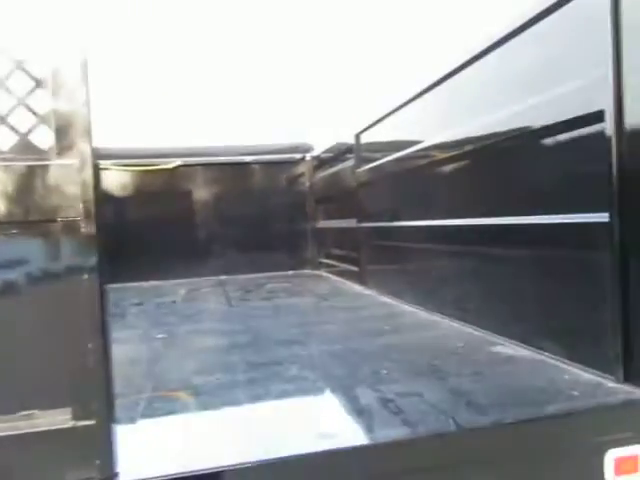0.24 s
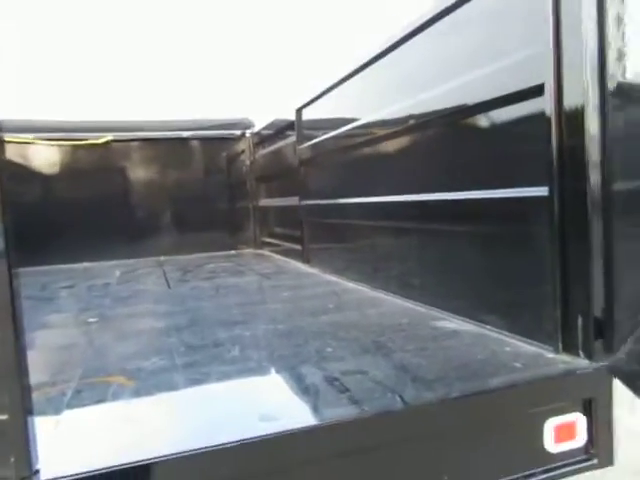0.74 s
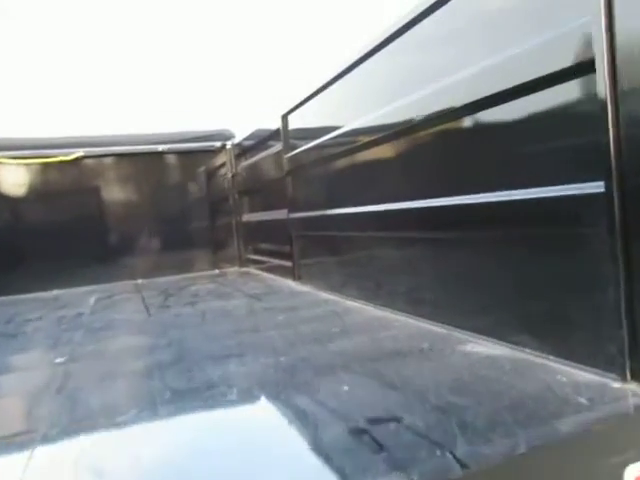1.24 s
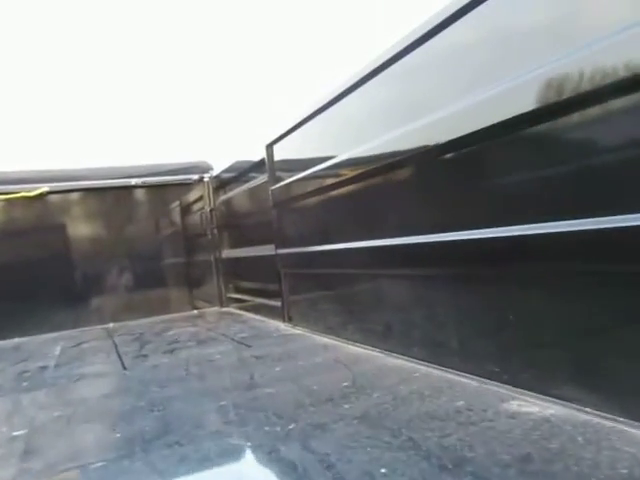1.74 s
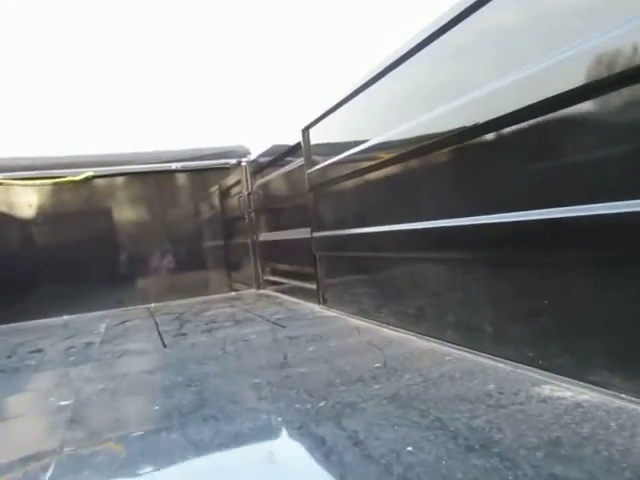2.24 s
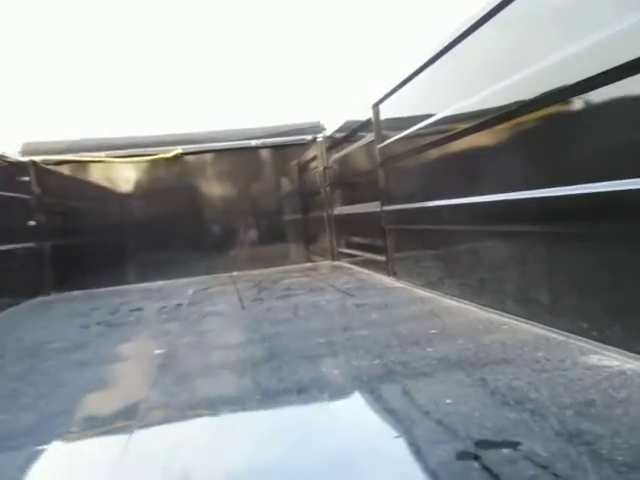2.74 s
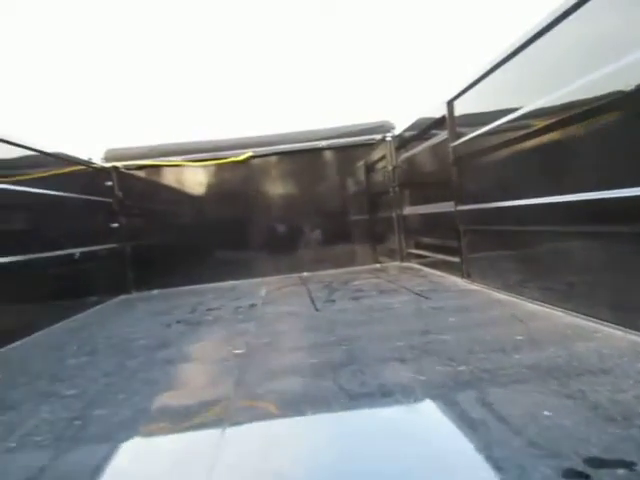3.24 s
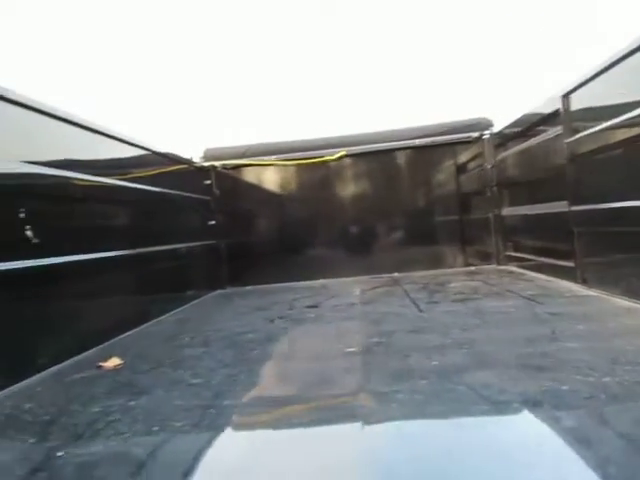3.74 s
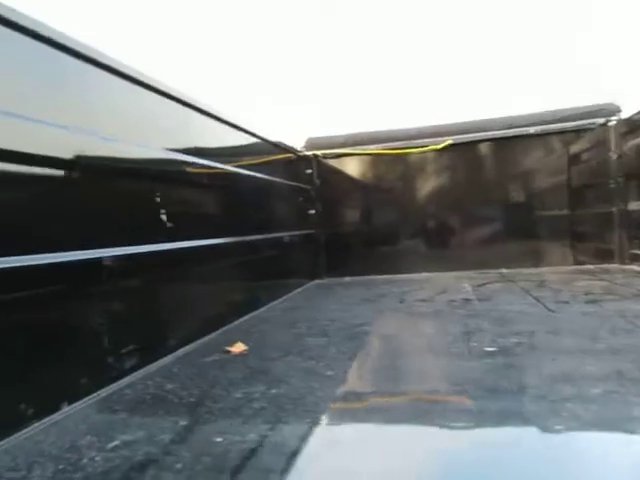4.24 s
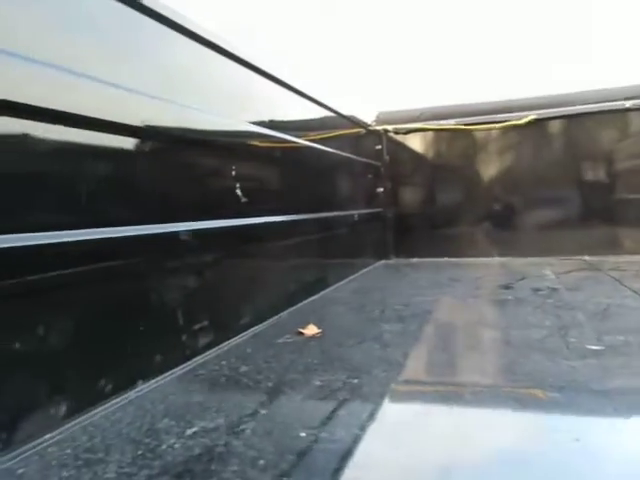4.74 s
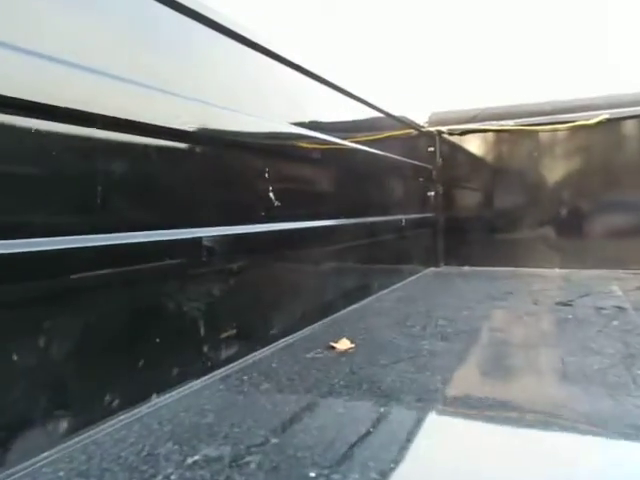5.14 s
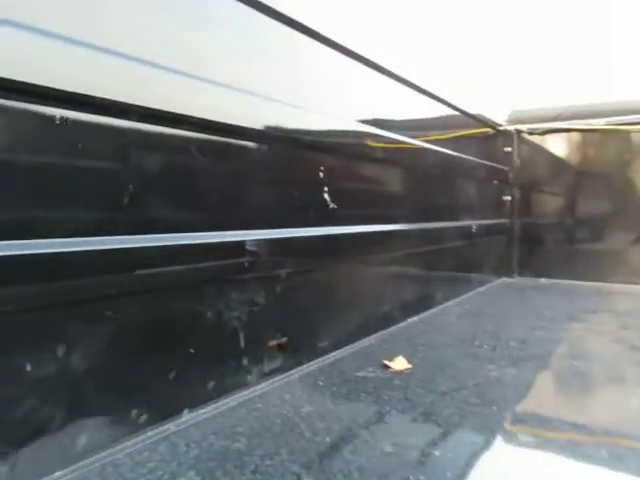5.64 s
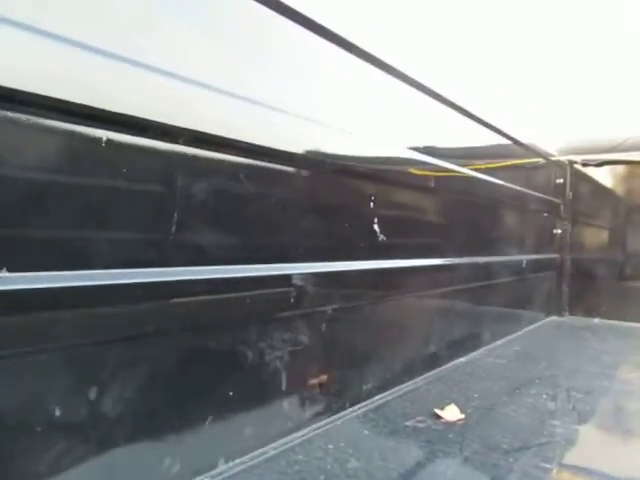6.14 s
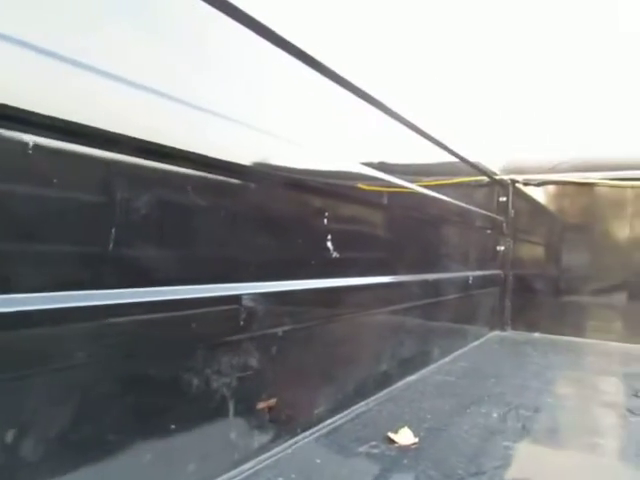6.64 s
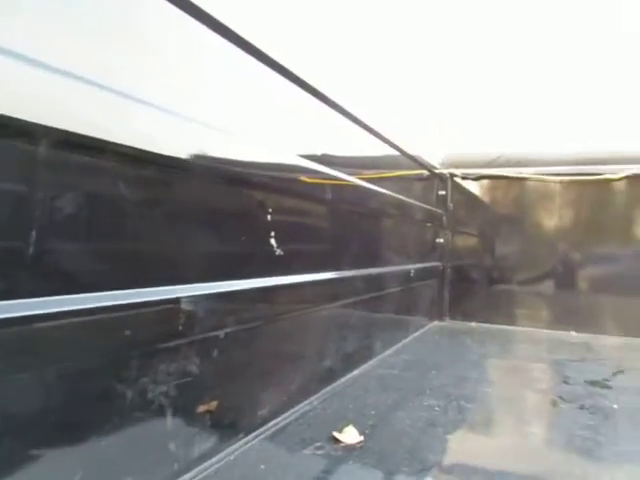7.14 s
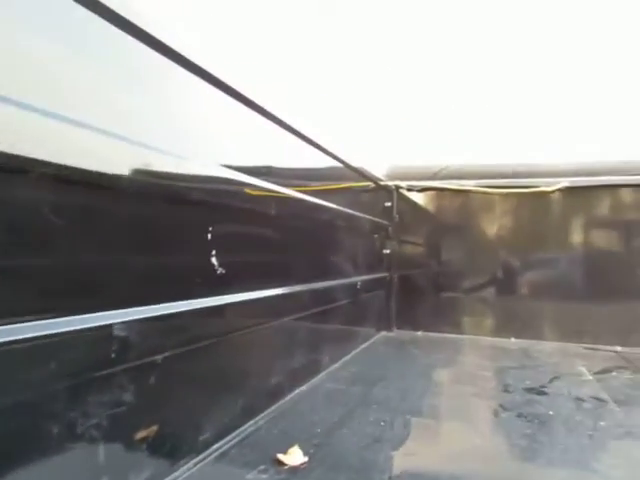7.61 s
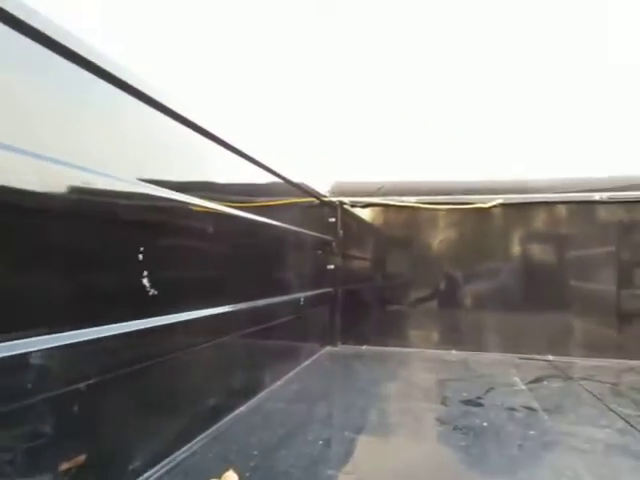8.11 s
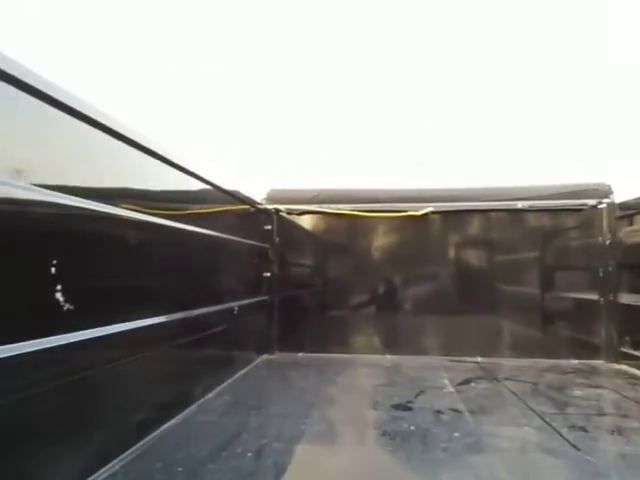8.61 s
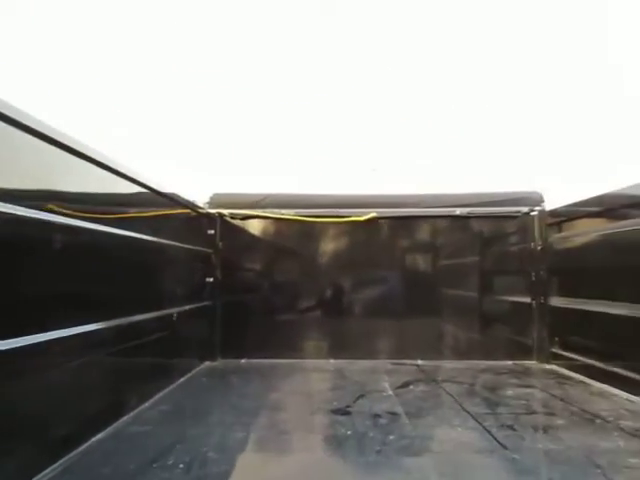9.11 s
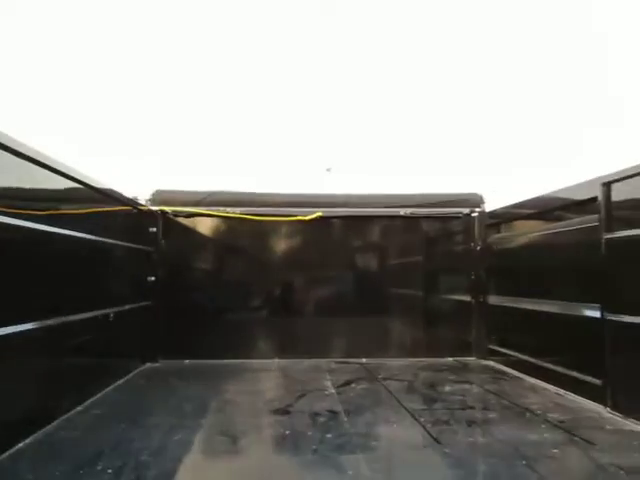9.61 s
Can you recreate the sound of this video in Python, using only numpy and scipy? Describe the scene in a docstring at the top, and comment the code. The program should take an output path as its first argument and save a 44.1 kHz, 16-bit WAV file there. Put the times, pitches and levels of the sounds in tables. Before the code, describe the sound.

Sharp metallic bangs on sheet steel ring out over a steady low engine drone, then a tiny clink and a brief rasping rattle.

```python
"""Heard from a steel truck bed in an open lot, as the level rises over the first two seconds:
from 0 s, blows on sheet metal (modes, crack, clatter) ring over the noise bands of a roaring yard.
An engine passes, a harmonic series sinking by Doppler shift; low tones come and go. Rattles and rasps (band
noise) sound at 2.4 s, 3.9 s and from 6.6 s; near 4 s a small steel part clinks (short modes); from about 6 s
a fainter engine follows. A close pair of ports hears the bass nearly alike and the treble less alike."""
import sys
import numpy as np
from scipy import signal
from scipy.fft import rfft, irfft, next_fast_len
from scipy.io import wavfile
from scipy.ndimage import uniform_filter1d

SR = 44100
rng = np.random.default_rng(int(sys.argv[2]) if len(sys.argv) > 2 else 0)


def generate_wav(sig):
    """Save sig (samples, or channels by samples) to the path in sys.argv[1] as 16-bit PCM at SR."""
    pcm = np.round(np.clip(np.atleast_2d(sig).T, -1, 1) * 32767).astype(np.int16)
    wavfile.write(sys.argv[1], SR, pcm)


N = 435266  # samples

# Relative spectra of the yard's roar, low rumble and bed boom, and of port hiss: frequency_hz, density_db
ROAR_SPECTRUM = [(260, -35), (450, -5), (484, -3), (627, -3.5), (675, -2.5), (832, -2.5), (1130, -7),
                 (1230, -9.5), (1520, -12), (2490, -24.5), (2740, -27), (4220, -37), (5330, -40.5),
                 (6250, -52), (8500, -53.5), (11000, -72.5), (18700, -120)]
RUMBLE_SPECTRUM = [(10, -52), (20, -37.5), (30, -18), (45, 11.5), (70, 13), (110, 7), (140, 6.5),
                   (190, 0.5), (300, -44.5), (1000, -120)]
BOOM_SPECTRUM = [(40, -85.5), (120, -5), (190, 2), (250, 1), (310, 2.5), (400, -1), (450, 0.5),
                 (520, -10.5), (800, -56), (2000, -120)]
HISS_SPECTRUM = [(1500, -38.5), (4000, -7.5), (6000, 2.5), (8000, -2.5), (10000, -6), (12000, -9),
                 (14000, -15.5), (15200, -16), (16500, -62)]
ROAR_DB, RUMBLE_DB, BOOM_DB, HISS_DB = -32, -30.5, -33, -63  # before swells and the opening rise
# Level changes of the yard: middle_s, half_width_s, roar_db, rumble_db, boom_db
YARD_SWELLS = [(2.201, 0.2, 0, 3.5, 4), (2.95, 0.33, 1, 5.5, 3), (3.62, 0.15, 0.5, 7.5, -0.5),
               (4.75, 0.15, 1, 0.5, -3), (5.2, .4, 1, -0.5, -1), (6.9, 0.62, 2.5, 1, 0.5),
               (7.3, 0.35, 0, -1.5, 1.5), (8, 0.42, 0.5, -0.5, 2.5), (9.6, 0.18, 1, -2, 6)]
FIRING_THROB = 0.4  # greatest fractional lift of the roar by one firing

# Thin low tones that come and go, some perhaps of motors: start_s, length_s, level_db, pitch_hz
DRONE_EVENTS = [(1.5, 1.6, -38, 69.5), (1.6, 2.1, -33, 139), (1.7, 1.6, -37, 209), (1.6, 2.6, -41, 382),
                (5.9, 1.4, -43, 379), (8.4, 1.47, -41, 377), (5.5, 4.3, -41, 99), (8.9, .97, -39, 224),
                (8.8, 1.07, -42, 237), (9, .87, -38, 403), (0, 1, -32, 113), (5.7, .5, -40, 303)]
# Rattles and rasps, and the brief high scrape just before the clink:
# start_s, length_s, level_db (before the swell), pitch_hz, width_hz
RATTLE_EVENTS = [(2.43, .3, -57, 3550, 800), (6.6, .08, -35, 1600, 120), (6.67, .05, -34, 1600, 130),
                 (6.65, .07, -43, 2150, 300), (6.69, .1, -32, 950, 150), (6.82, .06, -31, 1030, 120),
                 (6.85, .38, -33.5, 1020, 140), (6.87, .055, -32, 1600, 180), (6.92, .045, -33, 1600, 180),
                 (6.875, .05, -39, 2250, 300), (6.905, .07, -38, 2200, 1000), (6.96, .06, -42, 2250, 350),
                 (6.96, .11, -39, 1800, 350), (7.08, .09, -41, 1620, 300), (6.8, .3, -39, 1800, 1400),
                 (6.58, .16, -41, 1800, 900), (7.2, 1.3, -54, 2800, 800), (7.3, 1.2, -62, 5000, 2500),
                 (3.928, .03, -52, 7400, 1800), (3.935, .045, -47, 7750, 500)]

# Touches of a small steel part: start_s, level_db, tilt_db_per_octave
CLINK_EVENTS = [(3.963, -33.5, 17), (3.967, -34.5, -6), (3.974, -29, 3), (3.981, -45, 16), (3.995, -45, 11),
                (4.008, -47, 0), (4.021, -50, -2)]
# Modes of the steel part: frequency_hz, relative_level_db, t60_s
STEEL_MODES = [(3747, -3, .17), (3895, -6, .15), (4745, -10, .12), (4970, -5, .11), (5163, -2, .11),
               (5320, -5, .11), (5680, -10, .12), (7110, -20, .12), (7450, -13, .15), (7800, -17, .12),
               (8400, -24, .12)]
# Relative spectrum of the grit of the touch: frequency_hz, density_db
GRIT_SPECTRUM = [(1880, -49), (3200, -18), (3380, -23), (3470, -19), (3790, -4), (4340, -10), (5330, -13),
                 (6720, -18), (8520, -20), (8990, -39), (9500, -81), (12400, -111), (20900, -120)]
GRIT_DB = -3  # against the modes
FLUTTER_DB = 2.2  # rms flutter of ringing modes

# Blows on sheet metal: start_s, level_db, tilt_db_per_octave, crack_db and ring_db (over the clatter),
# rise_s (time constant), treble_t60_s
BLOW_EVENTS = [(0, -9.5, -5.5, -10.5, -12, 0.004, 0.33), (.3184, -10.5, 0, -4, -8, 0.003, 0.14),
               (.8932, -13.5, -3, -4, -9, 0.0033, 0.1), (2.0942, -14.5, -2, -5.5, -1.5, 0.0048, 0.2),
               (2.69, -17.5, -4, -35, -15, 0.025, 0.1), (3.2, -23.5, -9, -35, -12, 0.03, .17)]
# Modes of the sheet: frequency_hz, relative_level_db, t60_s
SHEET_MODES = [(305, -4, .55), (416, -2, .35), (510, -10, .3), (655, -3, .2), (820, -6, .25),
               (990, -8, .25), (1200, -7, .15), (1430, -2, .1), (1570, -7, .15), (2410, -4, .14),
               (2495, -3, .14), (3190, -12, .1), (3285, -11, .1), (3480, -14, .11), (4230, -24, .1),
               (5330, -22, .12), (5470, -19, .13), (5630, -12, .08), (7150, -24, .12)]
# Relative spectra of dense small modes with echoes, and of the first contact: frequency_hz, density_db
CLATTER_SPECTRUM = [(50, -62), (120, -11), (250, -9.5), (600, -4), (900, -4.5), (1250, -10), (1600, -9),
                    (2400, -14), (3300, -18.5), (4200, -21.5), (5600, -31.5), (7200, -25), (8500, -76.5),
                    (12000, -120)]
CRACK_SPECTRUM = [(200, -50), (400, -12), (850, 0), (1300, -7), (1850, -1), (2150, -7), (2450, -2),
                  (2900, -12), (3500, -12), (4000, -26), (4400, -21), (4900, -26), (5550, -12), (6200, -25),
                  (7800, -29), (9000, -50), (12000, -110)]
# Decay of the clatter below the treble: frequency_hz, t60_s
CLATTER_DECAY = [(200, 1), (500, 0.83), (1000, 0.6), (2000, 0.34)]
TREBLE_HZ = 4000  # from here up each blow dies in its own time
BASS_HZ, BASS_RISE_S = 950, 0.02  # below here the sheet takes longer to start booming
BOUNCE_DB = 1.5  # rms chatter of the loose sheet

# Straight passes: closest_s, firing_hz (at closest), speed_m_per_s, distance_m
NEAR_PASS = (2.5, 85.2, 35, 255)
FAR_PASS = (8.3, 85.1, 35, 300)
# Firing orders, swelling and fading by echoes of ground and bed: time_s, then level_db from order 1 up
NEAR_ORDERS = [(0, -56, -34, -34, -31, -48, -45), (0.6, -33, -22.5, -35.5, -38.0, -42, -71.0),
               (1.2, -30.5, -26, -39.5, -41.5, -34.5, -56), (1.6, -31, -20.5, -33.5, -37.5, -37.5, -51),
               (2, -40.5, -26.5, -37.5, -33.5, -38, -43), (2.7, -26, -16, -36.5, -36.5, -34.5, -46.0),
               (3.05, -25.5, -22.5, -41.0, -40.5, -39.5, -45), (3.5, -30.5, -24, -37.5, -44, -45, -52),
               (3.9, -29.5, -25, -37.5, -53, -41.0, -47.0), (4.4, -22.5, -19.5, -35.5, -43.5, -48.5, -49),
               (4.8, -21, -22.5, -40.5, -41.5, -54.0, -50.0), (5.5, -26, -32.5, -37, -44, -47.0, -47),
               (6, -29, -38, -39.5, -63.0, -51.0, -48.0), (6.4, -30, -36, -34, -43.0, -64.0, -60.0),
               (6.9, -24.5, -30.5, -38.5, -37, -42.0, -47), (7.6, -24.5, -33.5, -35.5, -45, -65.0, -58.0),
               (8.3, -28, -35.5, -52, -43, -65.0, -60.0), (9, -26.5, -39, -48, -50, -62.0, -50.0),
               (9.5, -34, -39, -48.0, -47, -50.0, -54), (9.87, -47, -47, -50.0, -56.0, -49.0, -51)]
FAR_ORDERS = [(6, -52, -50, -48.0, -51.0, -47.0), (6.8, -39, -48, -39, -62.0, -53.0),
              (7.5, -55, -51, -40.5, -59.0, -66), (8.3, -47, -60, -44.0, -46, -40),
              (8.6, -42, -59, -42.0, -46, -33), (9, -41, -56, -49, -51, -41),
              (9.5, -29.5, -32.5, -35.5, -46.0, -40), (9.87, -35, -42, -39, -57.0, -37)]
FADING_DB, FADING_S = 0.7, 0.2  # chance fading of orders 3 and up
SOUND_M_PER_S = 343

# Likeness of the two ports: frequency_hz, likeness (0 to 1)
PORT_LIKENESS = [(60, .999995), (100, .99995), (170, .9989), (300, .996), (700, .997), (1400, .99),
                 (3100, .92), (5500, .84), (9000, .85)]
# Phase lead of the left port: frequency_hz, lead_rad
LEFT_LEAD = [(100, 0), (500, 0), (1200, 0.05), (2500, 0.44), (3700, 1.27), (4300, 1.36), (5400, .5),
             (6800, 2.4), (8500, 3.5), (12000, 2.5)]
# Level of left minus right: frequency_hz, difference_db
LEFT_LEAN = [(100, 0), (380, 0.12), (700, 0.1), (1300, 1.04), (2400, 1.9), (4400, 2), (8000, -0.5),
             (15000, .2)]
EDGE_HZ = 15150  # band limit
RISE_DB_PER_S, FULL_S = 8.5, 2.107  # the level is brought up at the start


def amp(db):
    """Amplitude ratio of a level in decibels."""
    return 10 ** (np.asarray(db) / 20)


def evened(x):
    """Normalisation to unit rms."""
    return x / np.sqrt(np.mean(x ** 2) + 1e-20)


def smoothed(x, size):
    """Low-pass action of two running means."""
    return uniform_filter1d(uniform_filter1d(x, size), size)


def read(points, hz):
    """Linear interpolation along a logarithmic frequency axis."""
    frequency, value = np.transpose(points)
    return np.interp(np.log(hz + 1), np.log(frequency + 1), value)


def columns(table, t):
    """Linear interpolation of each table column in time."""
    s, *rest = np.transpose(table)
    return [np.interp(t, s, column) for column in rest]


def add(mix, start_s, sound):
    """Superposition: a sound is summed into the field from its start."""
    part = mix[:, round(max(start_s, 0) * SR):][:, :sound.shape[1]]
    part += sound[:, :part.shape[1]]


def drift(span_s):
    """Slow random variation: smoothed noise of about unit rms that changes over about span_s."""
    size = max(int(span_s * SR / 64), 1)
    steps = smoothed(rng.standard_normal(N // 64 + 2), size)
    return np.interp(np.arange(N) / 64, np.arange(len(steps)), evened(steps))


def noise(spectrum, patchy_db, size=1024):
    """Spectral shaping: two independent unit-rms noises of one colour with shared drifting patches."""
    frames, hz = 4 * N // size + 5, np.fft.rfftfreq(size, 1 / SR)
    used = hz[hz < spectrum[-1][0]]  # silent above the last point
    real, imaginary = rng.standard_normal((frames, len(used), 2, 2)).T
    patches = rng.standard_normal((frames, len(used))).T
    patches = uniform_filter1d(patches, size=16, axis=1)
    patches = evened(uniform_filter1d(patches, size=3, axis=0))
    colour_db = read(spectrum, used)[:, None] + patchy_db * np.clip(patches, -3, 2)
    bins = np.zeros((2, len(hz), frames), complex)
    bins[:, :len(used)] = (real + 1j * imaginary) * amp(colour_db)
    sound = signal.istft(bins, nperseg=size, noverlap=3 * size // 4)[1]
    return evened(sound[:, :N])


def puff(count, spectrum, tilt_db, centre_hz, t60):
    """Frequency-dependent decay: coloured noise whose bands die in t60(hz), about rms 1 at the start."""
    hz, s, bins = signal.stft(rng.standard_normal((2, count)), SR, nperseg=256, noverlap=192)
    colour_db = read(spectrum, hz) + tilt_db * np.log2(hz / centre_hz + 0.037)
    bins *= amp(colour_db[:, None] - 60 * s / t60(hz)[:, None])
    sound = signal.istft(bins, SR, nperseg=256, noverlap=192)[1][:, :count]
    return sound / sound[:, :SR // 100].std()


def ringing(modes, t, tilt_db, centre_hz, spread_db):
    """Modal superposition: decaying modes of chance strength and phase, fluttering by loose contact."""
    hz, db, t60 = np.transpose(modes)[:, :, None]
    luck = rng.standard_normal((len(modes), 1))
    phase = rng.random((2, len(modes), 1))  # turns, separate for each channel
    flutter = evened(smoothed(rng.standard_normal((len(modes), len(t))), 120))
    level_db = db + tilt_db * np.log2(hz / centre_hz) + spread_db * luck
    level_db = level_db - 60 * t / t60 + FLUTTER_DB * flutter
    return (amp(level_db) * np.sin(2 * np.pi * (hz * t + phase))).sum(axis=1)


def yard(turns):
    """Amplitude modulation: a roar throbs with each firing over gusty rumble and the boom of the bed."""
    t = np.arange(N) / SR
    swells = [np.outer(db, np.exp(-((t - s) / half_s) ** 2)) for s, half_s, *db in YARD_SWELLS]
    roar_db, rumble_db, boom_db = sum(swells)
    knocks = rng.random(int(turns[-1]) + 1)[turns.astype(int)]  # each firing has its own strength
    throb = 1 + FIRING_THROB * knocks * np.sin(np.pi * (turns % 1) ** 0.6) ** 2
    roar_level = amp(ROAR_DB + roar_db + 0.17 * drift(0.0049))
    rumble_level = amp(RUMBLE_DB + rumble_db + 1.2 * drift(0.17))
    boom_level = amp(BOOM_DB + boom_db + 2.0 * drift(0.29))
    roar = roar_level * throb * noise(ROAR_SPECTRUM, patchy_db=2.0, size=2048)
    rumble = rumble_level * noise(RUMBLE_SPECTRUM, patchy_db=-0.2, size=2048)
    boom = boom_level * noise(BOOM_SPECTRUM, patchy_db=1.5, size=2048)
    return roar + rumble + boom


def drone(length_s, level_db, pitch_hz):
    """Random modulation: a tone wavers in strength and phase under a half-sine swell."""
    t = np.arange(int(length_s * SR)) / SR
    phase = 0.12 * drift(0.15)[:len(t)] + rng.random((2, 1))  # turns
    wavering_db = level_db + 3 + 2 * drift(0.12)[:len(t)]  # 3 dB makes up for the swell
    swell = np.sin(np.pi * t / length_s) * amp(wavering_db)
    return np.sqrt(2) * swell * np.cos(2 * np.pi * (pitch_hz * t + phase))


def rattle(length_s, level_db, pitch_hz, width_hz):
    """Resonant filtering: lumpy noise through one band, under a rounded swell."""
    count = int(length_s * SR)
    edges = [pitch_hz - width_hz / 2, pitch_hz + width_hz / 2]
    band = signal.butter(3, edges, "bandpass", fs=SR, output="sos")
    lumps = amp(2.0 * evened(uniform_filter1d(rng.standard_normal(count), size=400)))
    sound = evened(signal.sosfilt(band, rng.standard_normal((2, count)) * lumps))
    return amp(level_db) * sound * np.hanning(count)


def clink(level_db, tilt_db):
    """Impact excitation: one touch of the steel part gives a gritty puff and short high modes."""
    t = np.arange(SR // 4) / SR
    ring = ringing(STEEL_MODES, t, tilt_db, 5000, spread_db=2)
    grit = puff(len(t), GRIT_SPECTRUM, tilt_db, 5000, lambda hz: 0.26 * (5000 / (hz + 1000)))
    body = amp(GRIT_DB) * grit + ring / ring[:, :SR // 100].std()
    onset = 1 - np.exp(-(t / 0.001) ** 2)
    return amp(level_db) * body * onset


def blow(level_db, tilt_db, crack_db, ring_db, rise_s, treble_t60):
    """Impact on a plate: a snap and crack, its modes, and a frequency-dependent clatter of echoes."""
    t = np.arange(SR // 2) / SR
    decay = CLATTER_DECAY + [(TREBLE_HZ, treble_t60)]
    clatter = puff(len(t), CLATTER_SPECTRUM, tilt_db, 1000, lambda hz: read(decay, hz))
    snap = 6 * np.sin(2 * np.pi * 1200 * t) * np.exp(-t / 0.0008)  # the sheet jumps under the blow
    contact = puff(len(t), CRACK_SPECTRUM, tilt_db, 1000, lambda hz: 0.06 + 0 * hz)
    crack = (contact - snap) * (1 - np.exp(-(t / 0.00015) ** 2))
    ring = ringing(SHEET_MODES, t, tilt_db, 1000, spread_db=-0.5)
    body = clatter + amp(ring_db) * ring / ring[:, :SR // 50].std()
    body = body * (1 - np.exp(-t / max(rise_s, 1e-4)))
    bass = signal.sosfilt(signal.butter(2, BASS_HZ, fs=SR, output="sos"), body)
    late_bass = body - bass * np.exp(-t / BASS_RISE_S)
    chatter = amp(BOUNCE_DB * evened(smoothed(rng.standard_normal(len(t)), 150)))
    return amp(level_db) * (late_bass * chatter + amp(crack_db) * crack)


def engine(closest_s, firing_hz, speed, distance, order_table):
    """Doppler effect: firing orders sink in pitch through a straight pass; also gives phase in turns."""
    t = np.arange(N) / SR
    along = speed * (t - closest_s)  # metres past the closest point
    receding = speed * along / np.hypot(along, distance)  # m/s
    turns = np.cumsum(firing_hz * (1 - receding / SOUND_M_PER_S)) / SR
    hum = np.zeros(N)
    for order, level_db in enumerate(columns(order_table, t), 1):
        path = rng.random() + 0.008 * order * drift(0.12)  # moving air shifts the path a little
        fading_db = (order > 2) * FADING_DB * drift(FADING_S) + 0.5 * drift(0.05)
        hum += np.sqrt(2) * amp(level_db + fading_db) * np.cos(2 * np.pi * (order * turns + path))
    fade_in = np.clip((t - order_table[0][0]) / 0.28 + 1, 0, 1)
    return hum * fade_in * np.array([[1], [-1]]), turns


def scene():
    """Superposition of all sources in two channels: the field at the left port and the one around it."""
    near_engine, turns = engine(*NEAR_PASS, NEAR_ORDERS)
    far_engine, _ = engine(*FAR_PASS, FAR_ORDERS)
    field = yard(turns) + far_engine + near_engine
    sources = [(DRONE_EVENTS, drone), (RATTLE_EVENTS, rattle), (CLINK_EVENTS, clink), (BLOW_EVENTS, blow)]
    for events, source in sources:
        for start_s, *settings in events:
            add(field, start_s, source(*settings))
    return field


def record(dry):
    """Spatial coherence: ports share bass more than treble; hiss, opening rise and band limit follow."""
    size = next_fast_len(N + 4096)
    hz = np.fft.rfftfreq(size, 1 / SR)
    left, around = rfft(dry, size)
    likeness = np.clip(read(PORT_LIKENESS, hz), 0, 1)
    lean = amp(read(LEFT_LEAN, hz) / 2)  # half of the difference to each port
    shared = likeness * left * np.exp(-1j * read(LEFT_LEAD, hz))
    right = shared + np.sqrt(1 - likeness ** 2) * around
    ports = irfft(np.array([left * lean, right / lean]), size)[:, :N]
    hissing = ports + amp(HISS_DB) * noise(HISS_SPECTRUM, patchy_db=1.5)
    rise_db = RISE_DB_PER_S * np.minimum(np.arange(N) / SR - FULL_S, 0)
    band_limit = signal.firwin(511, EDGE_HZ, window=("kaiser", 9), fs=SR)
    return signal.oaconvolve(hissing * amp(rise_db), band_limit[None], "same")


dry = scene()
out = record(dry)
generate_wav(out)
```